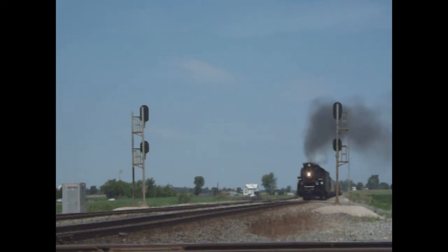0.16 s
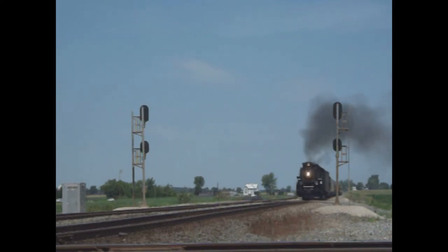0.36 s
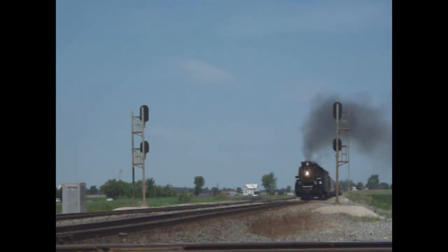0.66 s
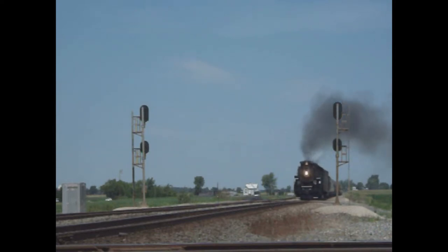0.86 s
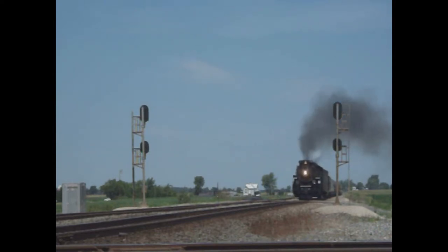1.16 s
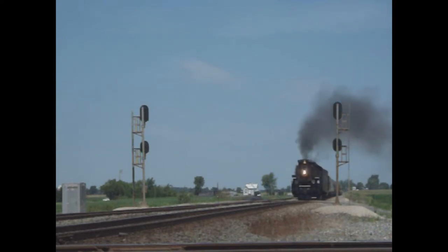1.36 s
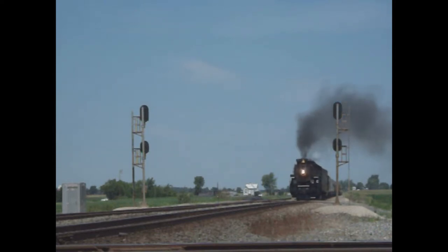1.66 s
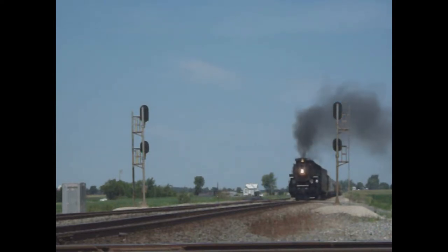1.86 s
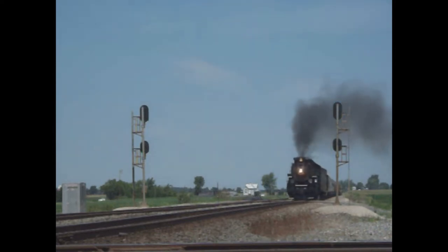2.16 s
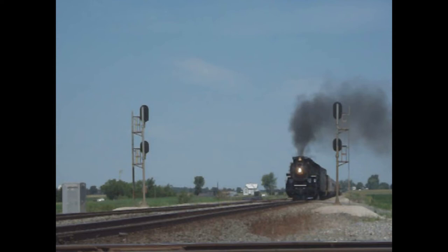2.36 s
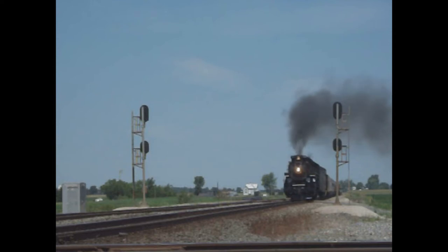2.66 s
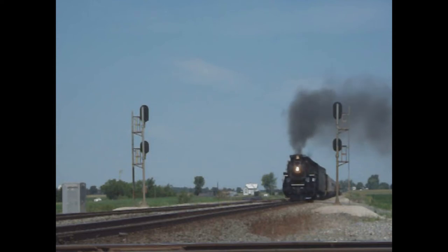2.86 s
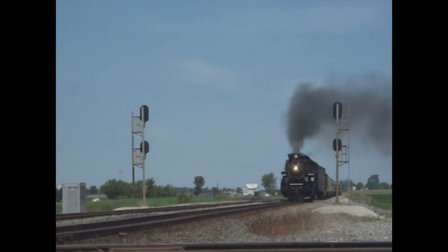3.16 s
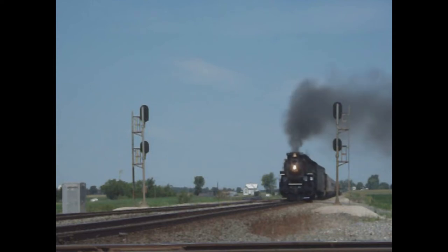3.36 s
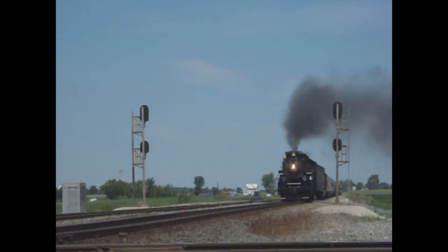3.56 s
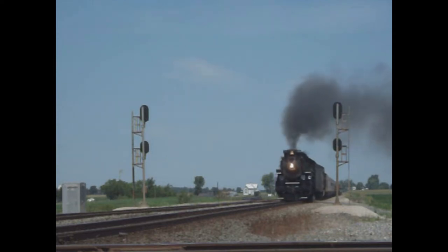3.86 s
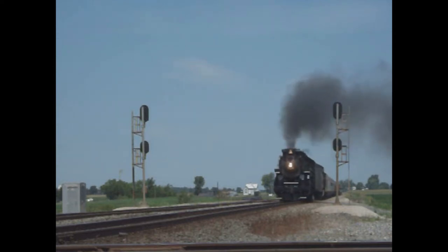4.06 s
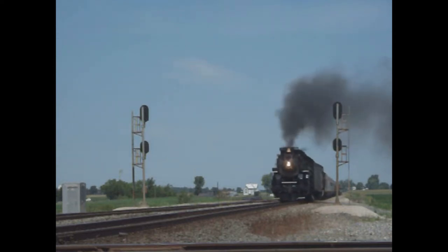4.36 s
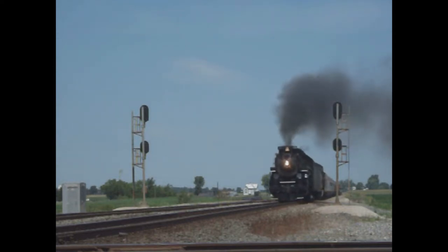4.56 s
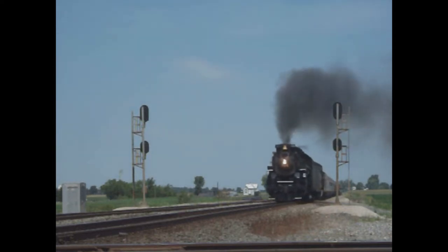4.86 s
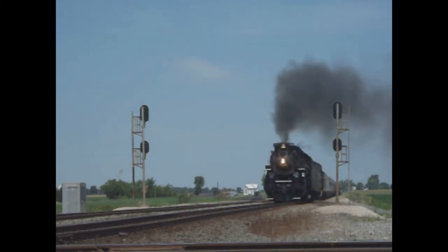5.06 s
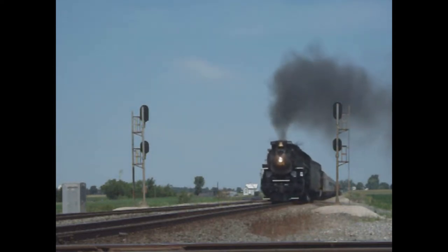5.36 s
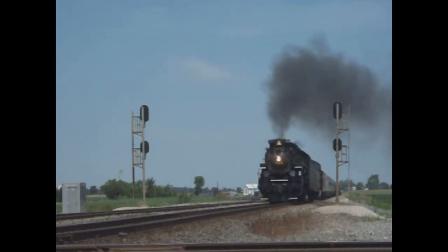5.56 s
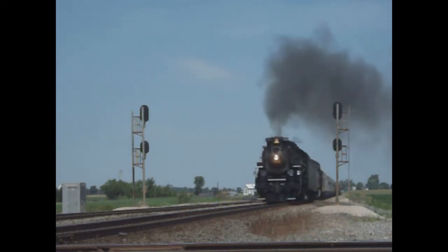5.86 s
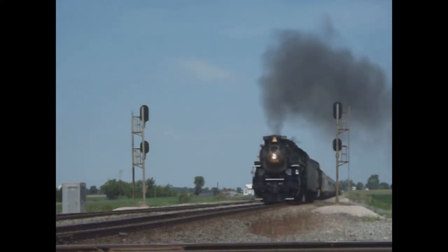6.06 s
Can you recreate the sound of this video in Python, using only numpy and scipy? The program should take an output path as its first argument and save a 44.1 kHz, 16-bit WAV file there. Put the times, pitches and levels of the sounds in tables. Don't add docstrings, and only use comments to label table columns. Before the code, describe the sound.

From 0 to about 2.8 seconds, a steam locomotive's whistle sounds continuously: six pipes in a dense, hoarse chord, the top note strongest near 650 Hz, wavering and fluttering in a loud rush of steam. It rises slightly at first, then eases lower after 1 second and again past 2 seconds. Fast exhaust beats are mostly buried underneath. Around 2.75 the valve shuts; the chord sags sharply, turns harsher and cuts off by 2.9. Faint echoes return from distant trees and fade within a second as automatic gain springs open. From 2.85 to 6.2, chuffs dominate at about eight per second, slightly uneven: low thump, hollow stack ring near 140 Hz, grainy roar and short hiss. The beats strengthen as the engine approaches, their hiss dulls, the top thins around 4.4, and a steam wash grows between blasts. Open air, dull band-limited microphone.

```python
import sys
import numpy as np
from scipy import signal
from scipy.fft import rfft, irfft
from scipy.io import wavfile
from scipy.ndimage import uniform_filter1d

SR = 44100
rng = np.random.default_rng(int(sys.argv[2]) if len(sys.argv) > 2 else 0)


def store_wav(level_fs):
    pcm = np.round(np.clip(np.atleast_2d(level_fs), -1, 1) * 32767)
    wavfile.write(sys.argv[1], SR, pcm.T.astype(np.int16))


def voltage_ratio(level):
    return 10 ** (np.asarray(level, float) / 20)


N = 273861
T = np.arange(N) / SR


def evened(x):
    return x / np.sqrt(np.mean(x ** 2) + 1e-20)


def curves(rows):
    s, *columns = np.transpose(rows)
    return [np.interp(T, s, c) for c in columns]


def drift(rate_hz):
    b, a = signal.butter(N=2, Wn=rate_hz, fs=SR)
    return evened(signal.lfilter(b, a, rng.standard_normal(N + SR))[SR:])


def noise(tone, lo_hz, hi_hz, patchy_db):
    frames = N // 128 + 6
    a, b, patch = rng.standard_normal((frames, 257, 3)).T
    patch = uniform_filter1d(patch, size=4, axis=0)
    patch = evened(uniform_filter1d(patch, size=9, axis=1))
    cells = (a + 1j * b) * voltage_ratio(patchy_db * patch)
    white = signal.istft(cells, nperseg=512, noverlap=384)[1][:N]
    hz = np.fft.rfftfreq(N, 1 / SR) + 1
    f, db = np.transpose(tone)
    edges = 1 / np.sqrt((1 + (lo_hz / hz) ** 6) * (1 + (hz / hi_hz) ** 6))
    colour = voltage_ratio(np.interp(np.log(hz), np.log(f), db))
    return evened(irfft(rfft(white) * edges * colour, N))


def train_of(s, db, shape):
    spikes = np.zeros(N + SR)
    spikes[np.round((s + .5 - .04) * SR).astype(int)] = voltage_ratio(db)
    return signal.oaconvolve(spikes, shape)[SR // 2:][:N]


def puff(late_s, rise_s, hold_s, fall_s):
    u = np.arange(SR // 4) / SR - .04 - late_s
    shape = np.exp(-np.maximum(u - hold_s, 0) / fall_s) / (1 + np.exp(-u / rise_s))
    return shape / shape.max()


def closing():
    close_s, width_s = 2.78, .035
    return 1 / (1 + np.exp((close_s - T) / width_s))


# delay t/s, level/dB
ECHO_RETURNS = [
    (.12, -23.5),
    (.228, -15),
    (.33, -26),
    (.44, -24.5),
    (.6, -24),
]


def echoes(x):
    tail_db = -46.5 - 60 * T[:SR] / 0.94
    taps = voltage_ratio(tail_db) * rng.standard_normal(SR) * (T[:SR] > .03)
    for s, db in ECHO_RETURNS:
        taps[round(s * SR)] = voltage_ratio(db)
    b, a = signal.butter(N=1, Wn=[480, 1300], btype="band", fs=SR)
    return signal.lfilter(b, a, signal.fftconvolve(x, taps)[:N])


# lateness t/s, thump level/dB
WHEEL_STROKES = [
    (.002, -29.5),
    (.004, -29.5),
    (-.001, -25),
    (-.005, -24.5),
]


def strokes():
    first_s, beat_s = -.002, .12435
    k = np.arange(51)
    late_s, thump_db = np.transpose(WHEEL_STROKES)[:, k % 4]
    return first_s + k * beat_s + late_s, thump_db


def thumps(stroke_s, thump_db):
    u = np.arange(SR // 8) / SR - .04
    thump = np.sin(2 * np.pi * 31 * (u + .0105)) * np.exp(-((u + .005) / .017) ** 2)
    return train_of(stroke_s, thump_db + 2.0, thump)


# f/Hz, width f/Hz, level/dB
STACK_MODES = [
    (141.8, 18, 3.5),
    (278.3, 36, -8),
    (89.4, 39, -7),
    (55, 26, -4.5),
    (194, 140, -7),
]


def stack_noise():
    hz = np.fft.rfftfreq(N, 1 / SR)
    gain = sum(voltage_ratio(db) / (1 + (2 * (hz - f) / width) ** 2) for f, width, db in STACK_MODES)
    return evened(irfft(rfft(rng.standard_normal(N)) * gain, N))


def stack_ring(s, beat_db):
    ring_db = -27.5 + 0.33 * (beat_db - beat_db.mean())
    shape = puff(late_s=-0.0016, rise_s=0.0076, hold_s=0.017, fall_s=0.036)
    rumble_db = -41
    return (train_of(s, ring_db, shape) + voltage_ratio(rumble_db)) * stack_noise()


# f/Hz, level/dB (per Hz)
BLAST_TONE = [(310, -13.5), (480, -7), (630, -2), (780, -4), (900, -8), (1150, -4.5), (1310, -15),
              (1460, -13), (1970, -22.5), (2500, -19), (4200, -28), (5500, -22), (6600, -26), (9000, -28)]
DIP_S = 4.36


def steam_roar(s, beat_db, lumps):
    wash_db, grows_db_per_s, spill_db = -32.5, 2.9, -20.5
    shape = puff(late_s=.001, rise_s=.0028, hold_s=.02, fall_s=.02)
    roar = train_of(s, beat_db - 9.8, shape) * lumps
    roar += voltage_ratio(wash_db + grows_db_per_s * np.maximum(T - DIP_S, 0))
    roar += voltage_ratio(spill_db) * (1 - closing())
    return roar * noise(BLAST_TONE, lo_hz=250, hi_hz=1430, patchy_db=2.5)


STROKE_BITE = [
    -1,
    -1,
    1.6,
    -0.14,
]


def steam_hiss(s, beat_db, lumps):
    dull_from_s, dull_to_s = 2.94, 5.1
    hiss_db = beat_db + np.interp(s, [dull_from_s, dull_to_s], [-10, -25.5])
    hiss_db = hiss_db + np.resize(STROKE_BITE, len(s))
    shape = puff(late_s=0.004, rise_s=0.0054, hold_s=0.015, fall_s=0.017)
    hiss = train_of(s, hiss_db, shape) * lumps
    hiss += voltage_ratio(-42 + np.interp(T, [dull_from_s, DIP_S], [3, 0]))
    hiss += voltage_ratio(-44.5) * (1 - closing())
    fizz = noise(BLAST_TONE, lo_hz=1700, hi_hz=4160, patchy_db=2.0)
    top = noise(BLAST_TONE, lo_hz=3700, hi_hz=20000, patchy_db=0.5)
    top_db = -3.5 - 7.5 * np.exp(-((T - DIP_S) / 0.72) ** 2)
    return hiss * (fizz + voltage_ratio(top_db) * top)


# t/s, level/dB
OPEN_BEATS = [(2.849, -13), (2.969, -19), (3.104, -15.5), (3.223, -14), (3.345, -13.5), (3.472, -14.5),
              (3.597, -14), (3.718, -12), (3.837, -13.5), (3.97, -13.5), (4.095, -12.5), (4.215, -10),
              (4.335, -11.5), (4.469, -14.5), (4.596, -13.5), (4.714, -9), (4.834, -10), (4.963, -12.5),
              (5.091, -14), (5.213, -9), (5.338, -10.5), (5.466, -13), (5.591, -10.5), (5.712, -11.5),
              (5.834, -11), (5.964, -12), (6.095, -12), (6.202, -17.5)]


def exhaust():
    stroke_s, thump_db = strokes()
    hidden = [stroke_s[:23], thump_db[:23] + 6.5]
    s, beat_db = np.hstack([hidden, np.transpose(OPEN_BEATS)])
    lumps = voltage_ratio(1.3 * drift(rate_hz=97))
    low = thumps(stroke_s, thump_db) + stack_ring(s, beat_db)
    return low + steam_roar(s, beat_db, lumps) + steam_hiss(s, beat_db, lumps)


# f/Hz, level/dB (per Hz)
WHISTLE_STEAM = [(200, -40.5), (290, -34.5), (350, -16), (500, -14.5), (640, -7), (730, -20), (900, -10.5),
                 (1150, -7.5), (1320, -12), (1850, -14), (2250, -5.5), (2700, -10), (3500, -15.5),
                 (9000, -23.5)]


def steam_jet(chord, after_s):
    shutting = np.sqrt(closing())
    body_db = -26.5 + 1 * T + 1.5 * shutting - 170 * after_s
    hiss_db = -27.5 + 1.7 * T - 12 * shutting - 120 * after_s
    body = voltage_ratio(body_db) * noise(WHISTLE_STEAM, lo_hz=200, hi_hz=1700, patchy_db=1.2)
    hiss = voltage_ratio(hiss_db) * noise(WHISTLE_STEAM, lo_hz=1700, hi_hz=20000, patchy_db=1.4)
    flutter = voltage_ratio(1.9 * drift(rate_hz=55))
    return (1 + 0.12 * evened(chord)) * flutter * (body + hiss)


# t/s, top chime f/Hz
STEAM_PITCH = [
    (0, 654),
    (.45, 661),
    (1, 659),
    (1.2, 651),
    (1.8, 648.3),
    (2, 648.8),
    (2.15, 640.4),
    (2.6, 635.8),
]
# pitch [share of top chime], level/dB (rms), drift [dB/s], 2nd and 3rd partial level/dB
PIPES = [
    (.497, -43.5, -2.5, -14, -1),
    (.555, -29.5, -1.37, -22.5, -20.5),
    (.636, -29.5, -0.8, -8, -10),
    (.702, -25.5, -0.48, -10, -16.5),
    (.795, -25.5, -1.75, -21.5, -21.5),
    (1, -21.5, -1.35, -49.5, -28.5),
]


def pipe_chord(valve_db):
    top_hz = curves(STEAM_PITCH)[0] * (1 - .15 * closing())
    sway = .005 * drift(rate_hz=9)
    chord = np.zeros(N)
    for share, db, drift_db, second_db, third_db in PIPES:
        waver = 1 + share ** 3 * sway + 0.0042 * drift(rate_hz=28.2)
        turn = 2 * np.pi * np.cumsum(share * top_hz * waver) / SR
        level = voltage_ratio(db + drift_db * T + 1.37 * drift(rate_hz=15.4))
        level *= voltage_ratio(1.4 * (1.5 - share) * np.minimum(valve_db + 5.0, 0))
        upper = voltage_ratio(second_db) * np.sin(2 * turn + 1) + voltage_ratio(third_db) * np.sin(3 * turn + 2)
        upper *= voltage_ratio(9 * closing() + 3.9 * drift(rate_hz=26))
        chord += np.sqrt(2) * level * (np.sin(turn) + upper)
    return chord


def whistle():
    cut_s = 2.793
    after_s = np.maximum(T - cut_s, 0)
    valve_db = -3.5 * closing() - 210 * after_s
    chord = pipe_chord(valve_db)
    shut = np.clip((2.91 - T) / 0.057, 0, 1)
    return voltage_ratio(13.5) * shut * (voltage_ratio(valve_db) * chord + steam_jet(chord, after_s))


def scene():
    blown = whistle()
    return (echoes(blown) + exhaust() + blown)[None]


def band_limit(x):
    return signal.sosfilt(signal.butter(12, 15720, fs=SR, output="sos"), x)


# t/s, level/dB
AUTO_GAIN = [
    (0, -12),
    (2.7, -11),
    (2.81, -9),
    (2.85, -1),
    (3.1, 0),
    (6.21, 0),
]
# f/Hz, level/dB
MIC_TONE = [(3500, -1), (4300, 0), (4900, -11), (5500, -21.5), (6000, -18.5), (6600, -14), (7600, -21.5),
            (8750, -27.5), (9000, -47.5), (10500, -40.5), (12500, -44.5), (13000, -52.5), (16000, -57.5)]


def record(dry):
    held = 1.1 * np.tanh(dry * voltage_ratio(curves(AUTO_GAIN)[0]) / 1.1)
    hz, db = np.transpose(MIC_TONE)
    colour = voltage_ratio(np.interp(np.fft.rfftfreq(N, 1 / SR), hz, db))
    clean = irfft(rfft(held) * colour, N)
    bent = clean - .004 * clean ** 3 + voltage_ratio(-97) * rng.standard_normal(N)
    return band_limit(bent + .0007)


dry = scene()
out = record(dry)
store_wav(out)
```